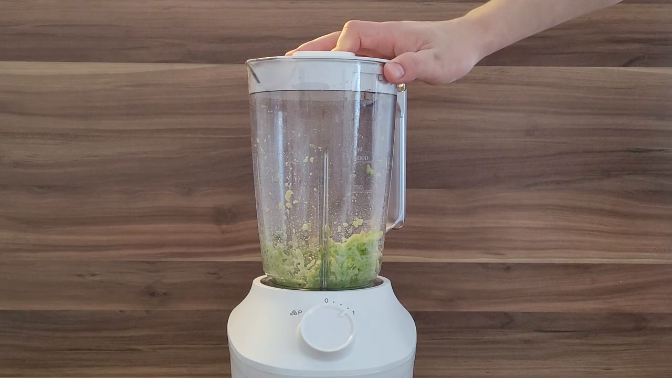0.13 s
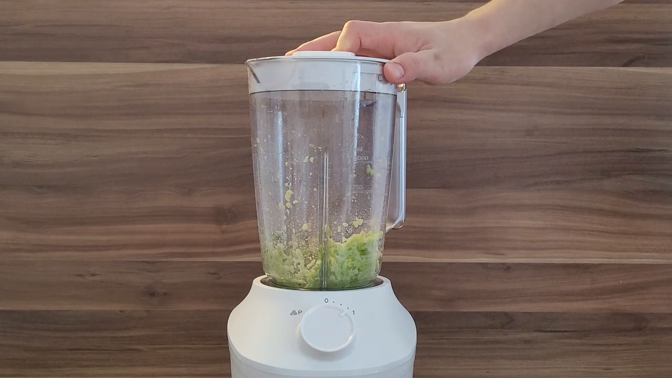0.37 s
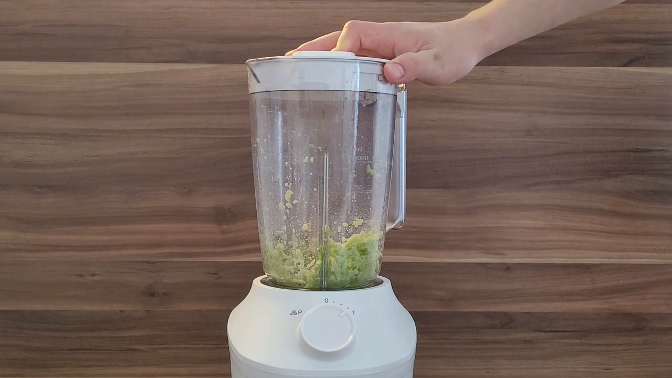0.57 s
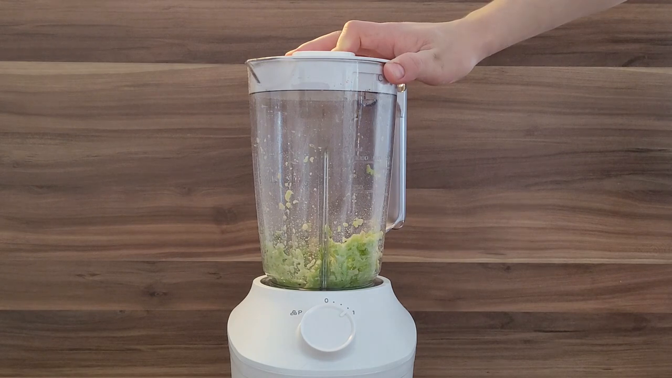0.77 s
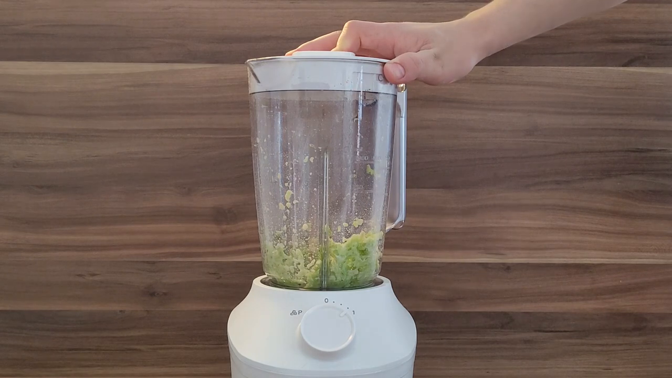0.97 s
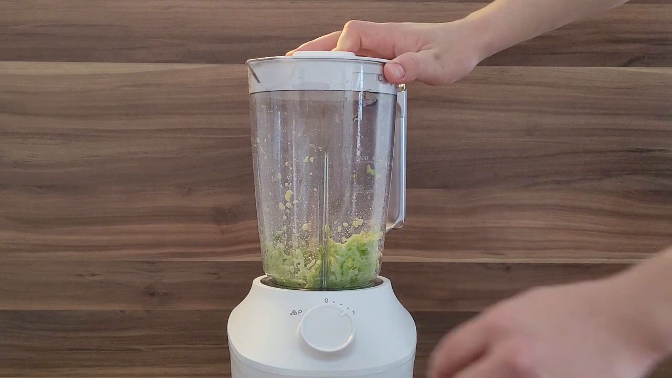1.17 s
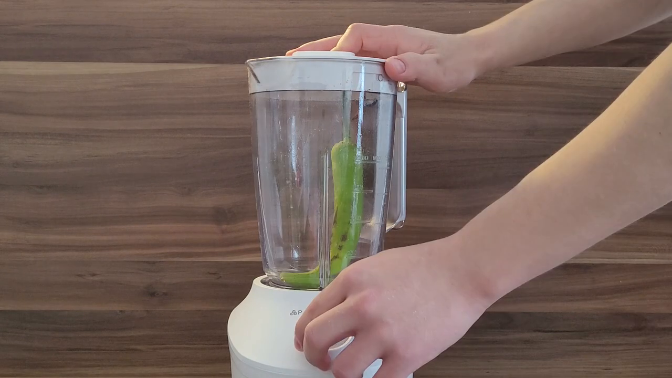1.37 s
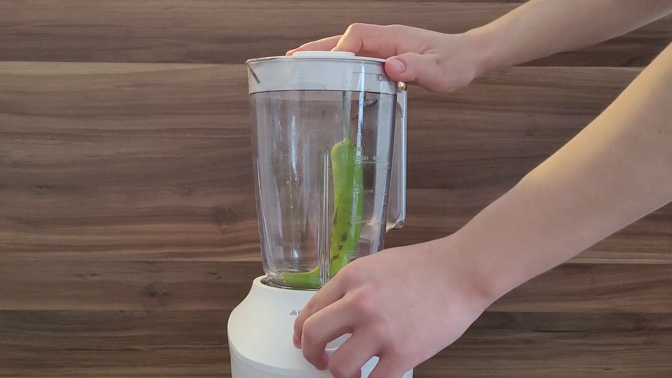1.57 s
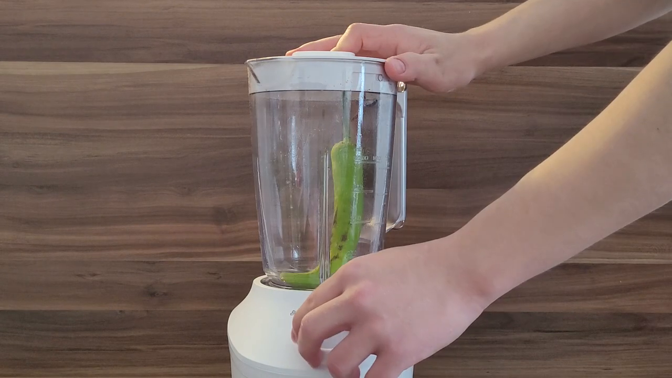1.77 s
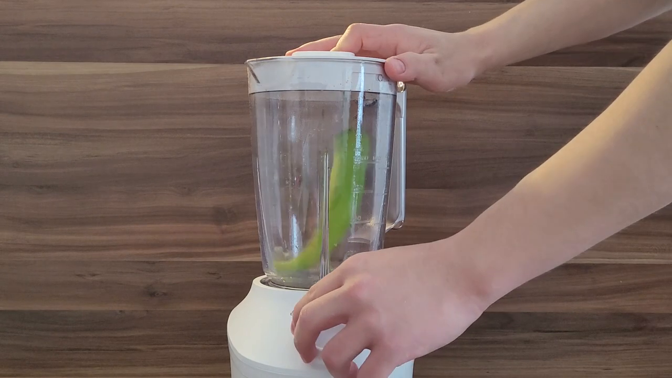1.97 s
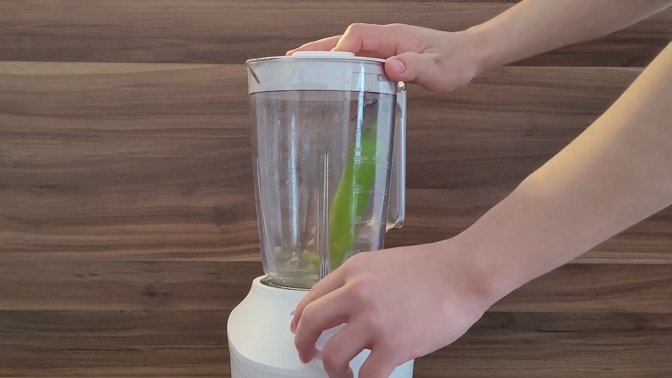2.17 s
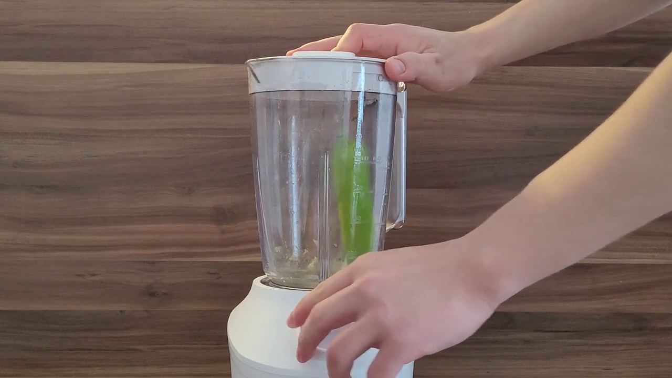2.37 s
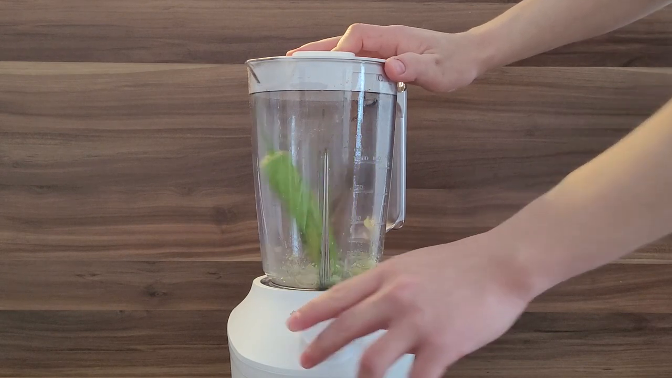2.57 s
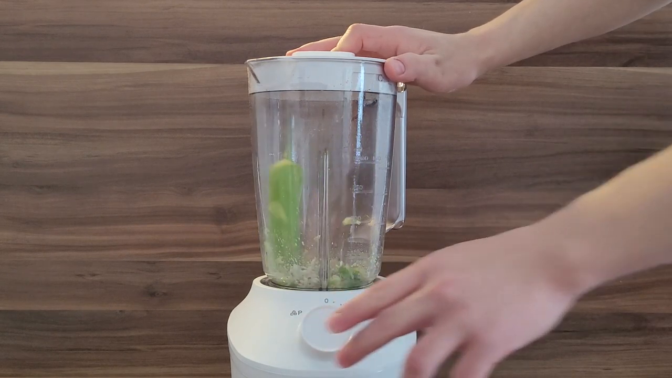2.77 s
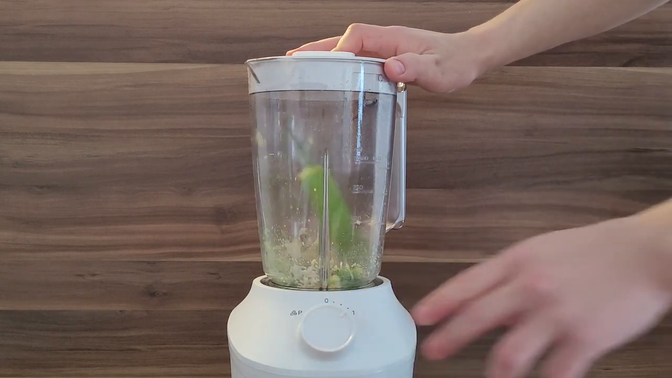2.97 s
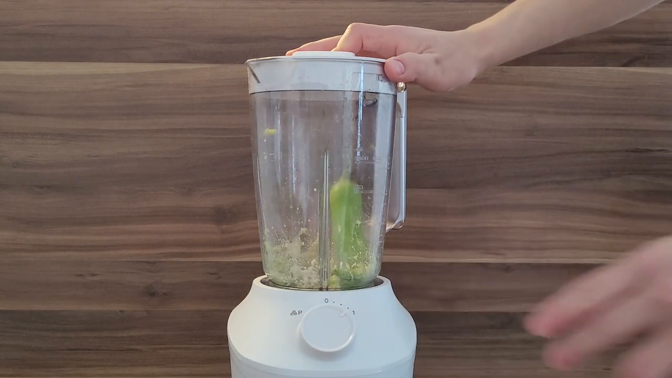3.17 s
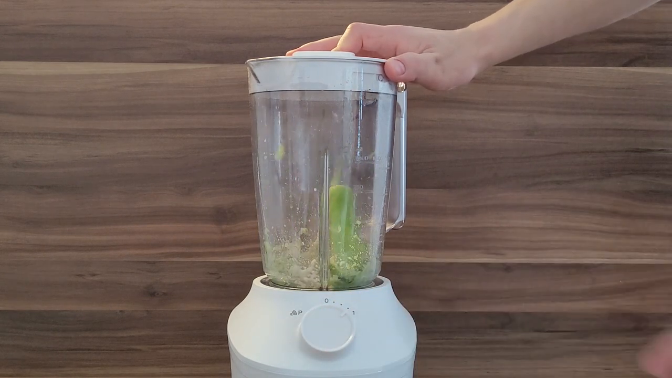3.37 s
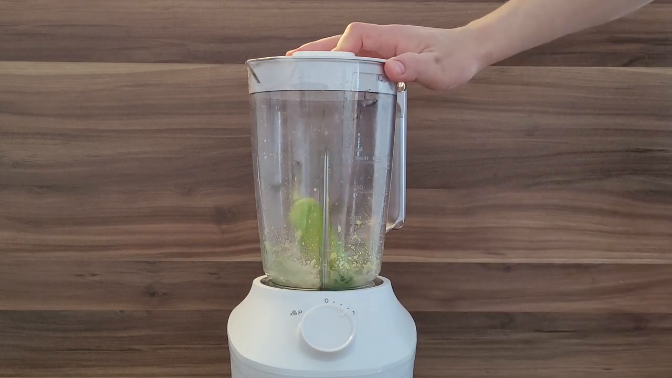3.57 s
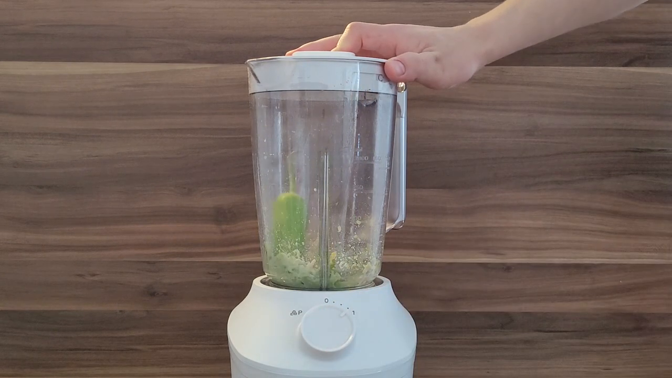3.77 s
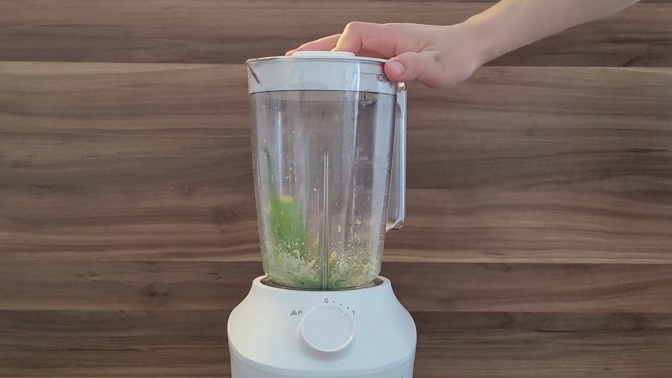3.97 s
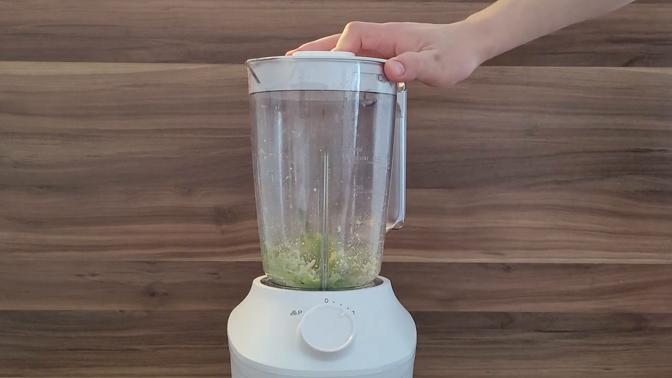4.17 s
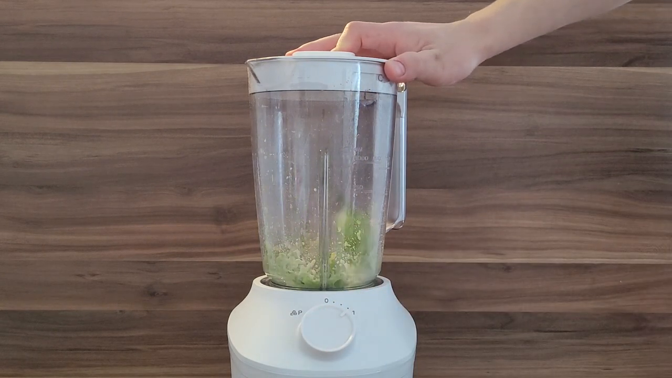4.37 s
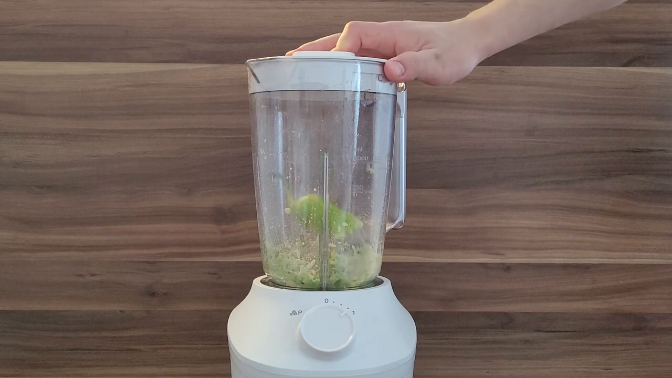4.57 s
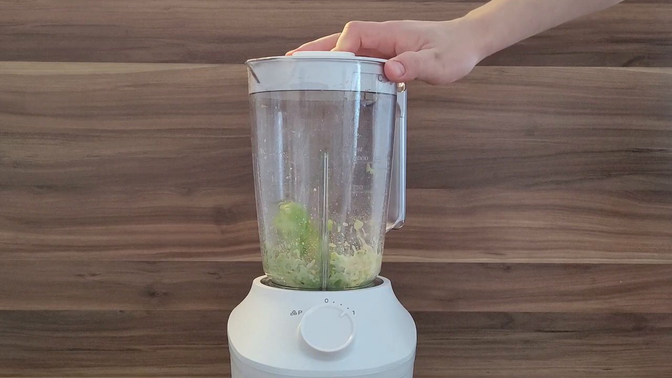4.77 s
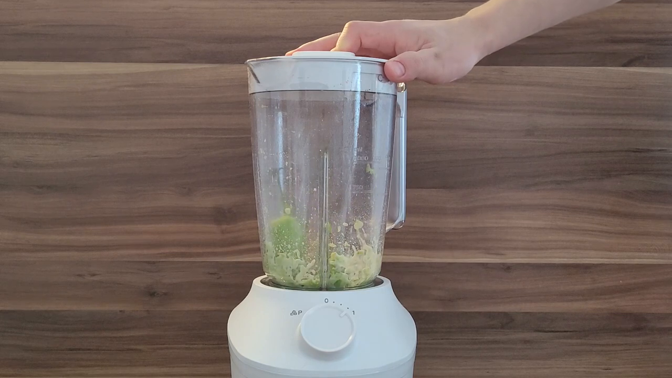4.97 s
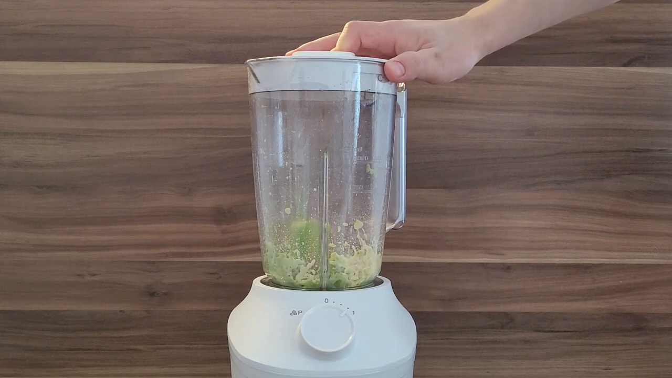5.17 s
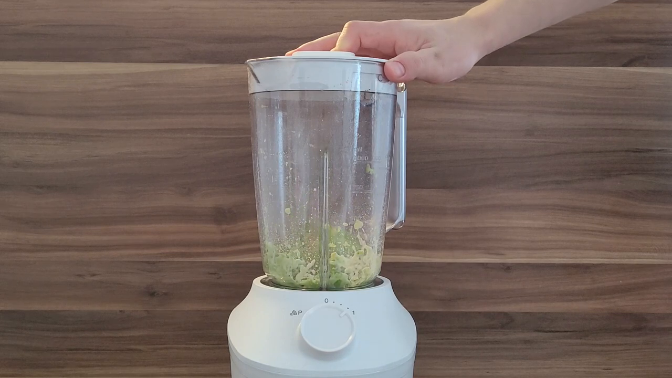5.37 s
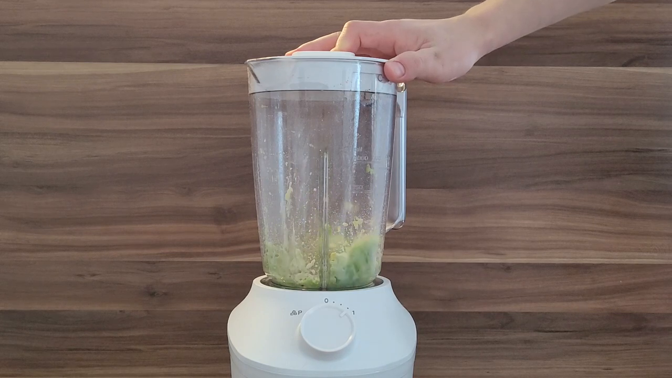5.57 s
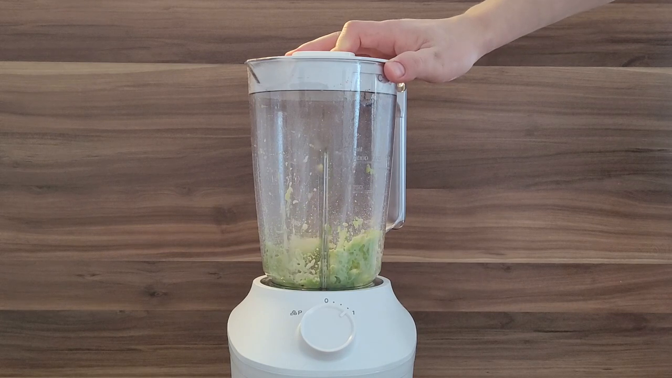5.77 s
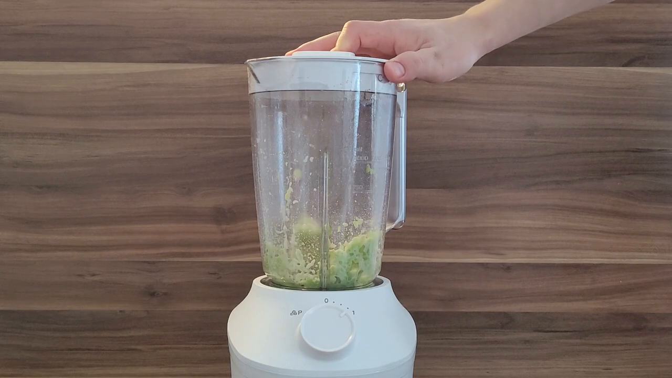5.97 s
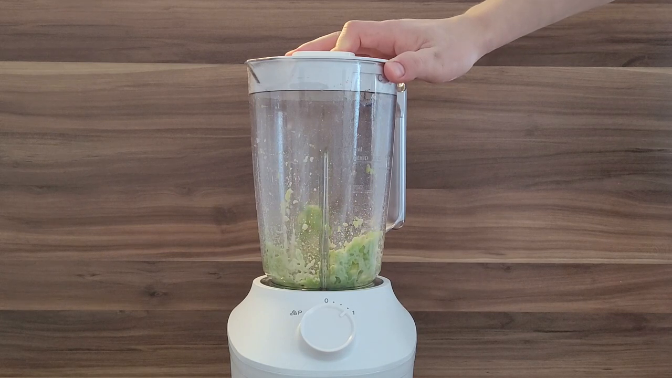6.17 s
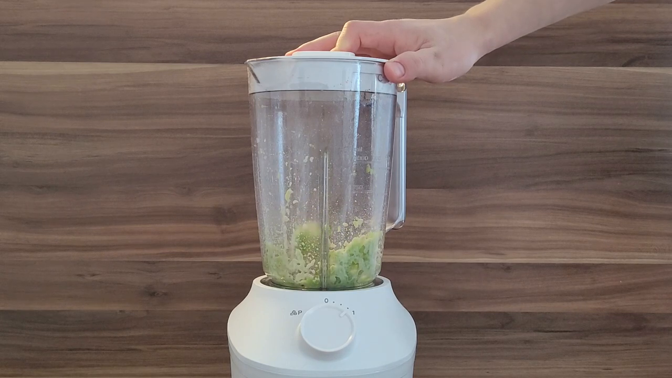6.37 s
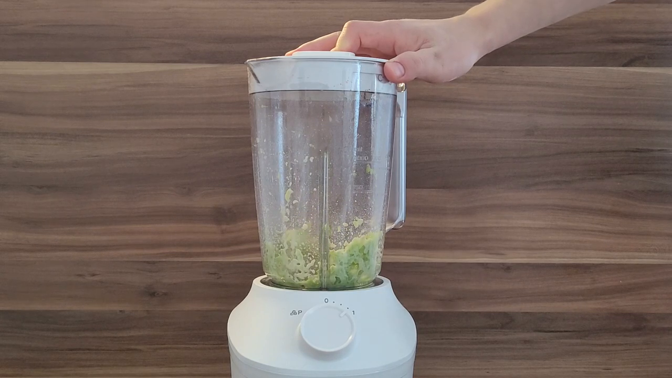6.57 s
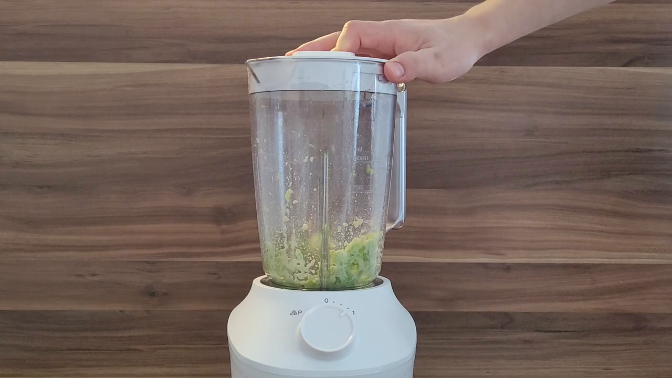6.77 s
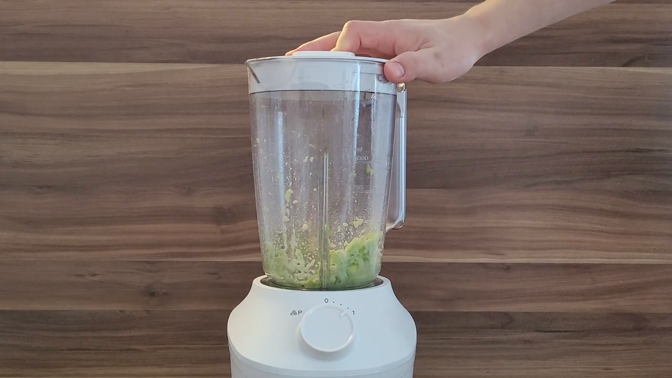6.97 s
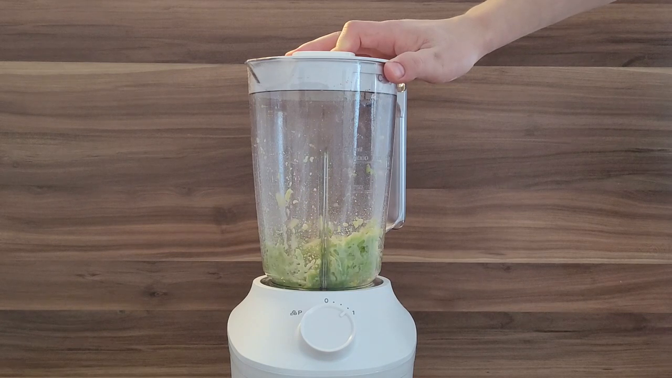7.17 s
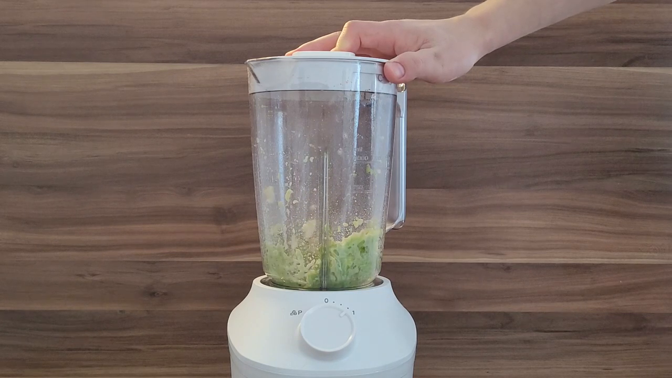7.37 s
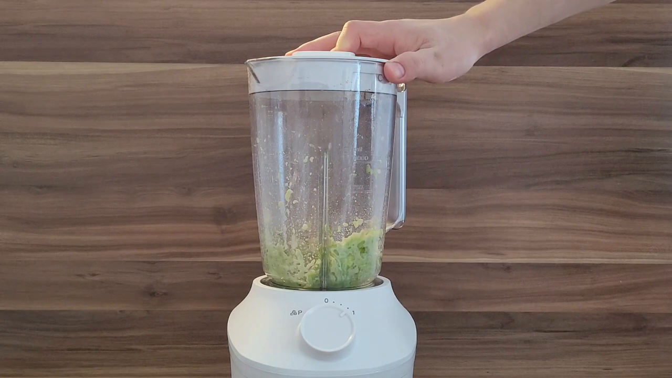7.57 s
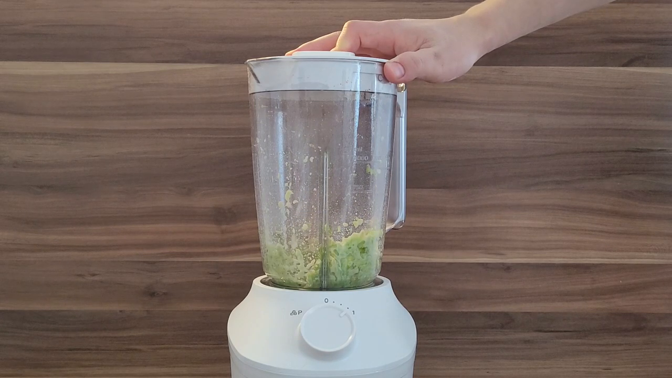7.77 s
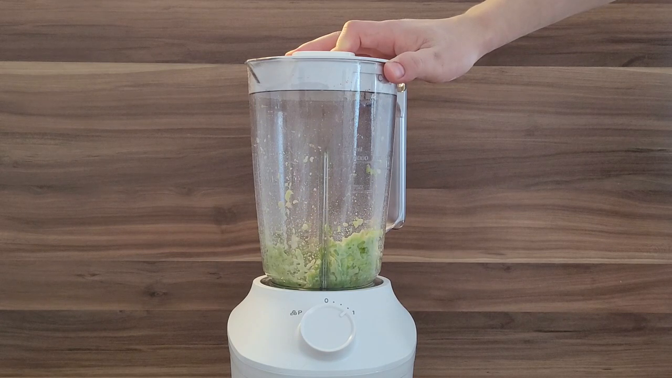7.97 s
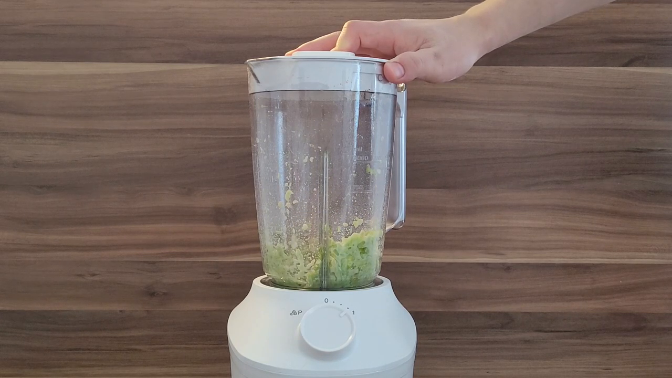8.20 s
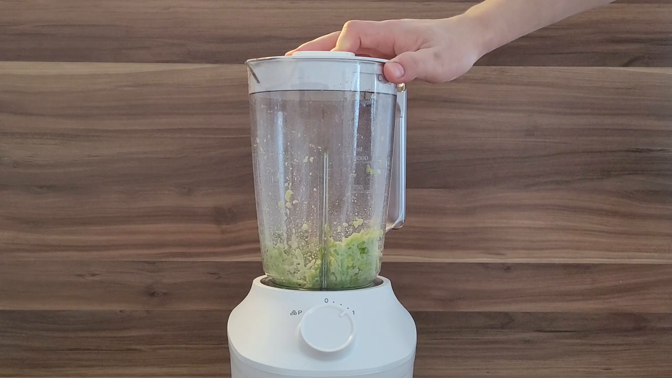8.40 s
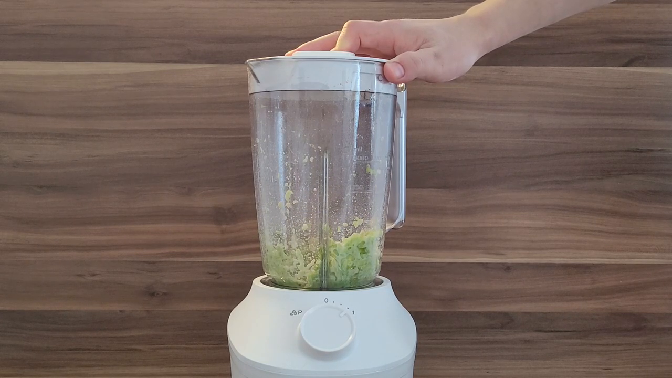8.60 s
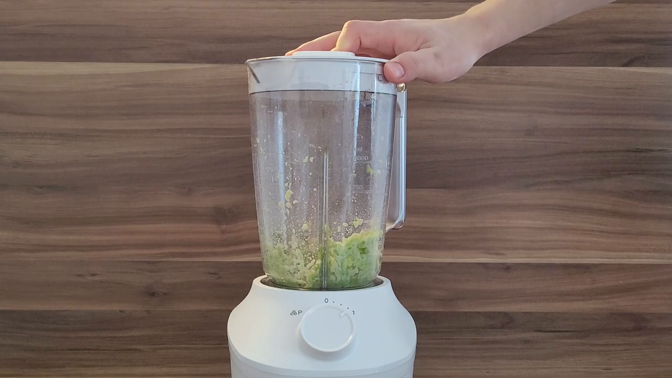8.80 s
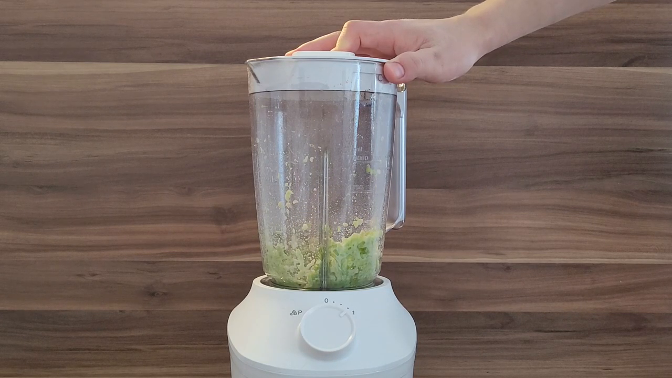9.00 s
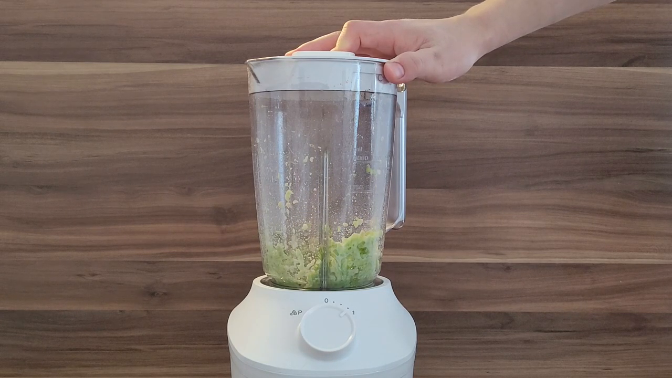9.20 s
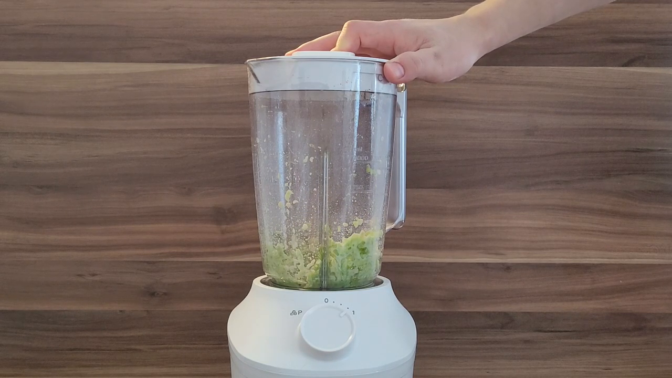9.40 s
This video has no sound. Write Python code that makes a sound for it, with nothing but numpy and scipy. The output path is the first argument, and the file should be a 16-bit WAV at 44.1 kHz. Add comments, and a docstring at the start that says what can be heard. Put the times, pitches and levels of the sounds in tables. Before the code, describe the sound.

Close stereo sound of a countertop blender in a quiet kitchen. From 0 to 1.2 seconds it spins freely at high speed: a steady bright whine with brush buzz, rushing air and a fine spray of clicking mince, cut off almost instantly. Faint room tone fills the gap until about 2.0, when the dial gives a quick double click and a low electrical buzz starts. From 2.1 the blades bite a whole pepper: dense, rough battering in surges, hard hollow knocks on the plastic jar, the motor sagging and recovering, all duller than before. Heavy bursts continue to about 4, with separate strong blows near 4.5, 5.2, 5.7, 6.7 and 7.1. Meanwhile the pitch creeps upward and the mince whirls. After 8 it is a fairly steady, dull humming churn; from 8.9 lower rocking tones join, still running at the end near 9.4.

```python
"""A countertop blender with a plastic jar in a kitchen, heard from close by with two microphones, left one nearer.
First it spins freely in minced pepper: motor tones, brush buzz, air noise and a spray of clicks, all breaking off.
After a pause of room tone the switch clicks, and the motor hums and buzzes up under a whole pepper.
Clustered clicks batter it in surges that brake the shaft, pieces knock on the jar, and mince whirls round it.
The shaft gathers speed as the pieces get smaller; near the end the rocking jar adds lower tones."""
import sys
import numpy as np
from scipy import signal
from scipy.fft import rfft, irfft, next_fast_len
from scipy.io import wavfile

SR = 44100
rng = np.random.default_rng(int(sys.argv[2]) if len(sys.argv) > 2 else 0)


def generate_wav(sig):
    """Save sig (samples, or channels by samples) to the path in sys.argv[1] as 16-bit PCM at SR."""
    pcm = np.round(np.clip(np.atleast_2d(sig).T, -1, 1) * 32767).astype(np.int16)
    wavfile.write(sys.argv[1], SR, pcm)


N = 416304
T = np.arange(N) / SR  # time [s]
SIZE = next_fast_len(N + SR // 2)  # transform length, with room for filter tails
HZ = np.maximum(np.arange(SIZE // 2 + 1) * SR / SIZE, 1)  # frequency of each transform bin

# Free run breaks off, switch is turned, blades begin to cut
BREAK_S, SWITCH_S, CUT_S = 1.237, 1.969, 2.066

# Shaft speed without drag, rising after the restart as the pieces shrink: (time [s], speed [turns/s])
UNLOADED_SPEED = [(0, 101.52), (1.22, 102.05), (1.97, 35), (2.15, 62.3), (2.35, 70.3), (2.7, 72.2),
                  (3.3, 81.85), (3.7, 83.6), (4.4, 84.7), (5, 86.05), (5.6, 85.9), (6.7, 88.1),
                  (7.8, 89.15), (8.7, 89.62), (9.44, 90.02)]
# Big pieces caught by the blades: (time [s], hold [s], level [dB], treble lift [dB])
BITES = [(2.10, .02, -24, 2.5), (2.24, .18, -20, 5), (2.559, .10, -20, 1.5), (2.83, .20, -18.5, 0.2),
         (3.342, .34, -23.5, -2), (3.81, .25, -21, -0.5), (4.321, 0.025, -30, 1), (4.508, .05, -17.5, 6),
         (5.071, .22, -24, 0), (5.672, .02, -15, 1.6), (5.829, .04, -26.5, -1.8), (6.11, 0.015, -24.5, -1),
         (6.381, .2, -32, -5), (6.732, .005, -18.5, -1.8), (7.151, .04, -13.5, 3.1),
         (7.78, .02, -27.5, -6.5), (7.91, 0.0044, -29.5, -5.5)]
# Chunks thrown against the jar: (time [s], strength [dB])
KNOCKS = [(2.066, 3), (2.102, 3.5), (2.139, 4), (2.223, 8), (2.272, 8), (2.303, 7.5), (2.44, 4),
          (2.911, 4.5), (3.423, 4), (3.554, -2), (3.676, 0), (3.842, 6), (3.891, 3), (3.963, 10.5),
          (4.043, 6.5), (4.507, 6.5), (5.133, 1), (5.238, 9.5), (5.279, 3.5), (5.641, 12.5), (5.823, 4.5),
          (5.938, 0.5), (6.124, 3), (6.721, 12.5), (6.943, 3.5), (7.107, 8.5), (7.144, 5.5), (7.178, 8),
          (7.769, -1), (7.906, -4.5), (8.472, -5)]
# Unbalanced shaft shaking the base, fitfully while the pepper is whole: (time [s], level [dB])
UNBALANCE = [(2.0, -38.5), (2.14, -32), (2.64, -36), (2.89, -24), (3.06, -33), (3.32, -24.5), (3.43, -36.5),
             (3.55, -30), (3.82, -45.5), (3.9, -28), (4.05, -25.5), (6.3, -25), (7.57, -30.5),
             (7.68, -26.5), (8.36, -25), (9.44, -26)]
# Detents passed by the dial: (time [s], strength [dB])
DETENTS = [(1.969, -7.5), (1.998, -13)]

# Tones of the free-running motor: (multiple of shaft speed [-], level [dB])
FREE_ORDERS = [(2, -40), (8 / 3, -34), (3, -28), (4, -43), (5, -48), (7, -42), (8, -49), (9, -33),
               (10, -49), (11, -40.5), (12, -49), (13, -44), (14, -48), (15, -36.5), (16, -44.5),
               (17, -43.5), (19, -45), (21, -45), (23, -44), (25, -46), (26, -47), (29, -47), (36, -47),
               (60, -49), (69, -56), (72, -46), (75, -52), (108, -55), (109, -55)]
# Tones of the loaded motor, 24 being the commutator: (multiple of shaft speed [-], level [dB])
LOADED_ORDERS = [(2, -48.5), (3, -46.5), (4, -43), (6, -49.5), (8, -44.5), (12, -43.5), (24, -46),
                 (25, -53), (36, -60.5), (48, -61.5), (60, -62.5), (72, -62.5)]
# Tones added by the rocking jar: (multiple of shaft speed [-], level [dB])
ROCKING_ORDERS = [(7 / 3, -33), (10 / 3, -37), (3, -39), (4.5, -44), (17 / 3, -40), (20 / 3, -43),
                  (26 / 3, -40.5)]

# Broad colour of each sound, scaled to unit power in use: (frequency [Hz], relative level [dB])
FREE_COLOUR = [(30, -42), (70, -31), (130, -8), (260, 1), (550, -16), (900, -5.5), (3400, -13),
               (4200, -15.5), (6000, -14.5), (6600, -20.5), (8000, -16), (8500, -26.5), (12000, -25.5),
               (15500, -29.5)]
CHOP_COLOUR = [(28, -14.5), (42, -6), (130, -9), (180, -17.5), (300, -6.5), (600, -2), (900, -4.5),
               (1200, -12.5), (1900, -16.5), (2600, -24), (3500, -24), (4500, -35), (6000, -27)]
CHURN_COLOUR = [(28, -14.5), (38, 0.5), (100, 1.5), (170, -25), (260, -14.5), (900, -8), (1200, -14.5),
                (2300, -20.5), (2700, -27.5), (4000, -27.5), (6000, -31)]
SWITCH_COLOUR = [(59, -48.5), (100, -27), (343, -4.5), (1690, -13), (1970, -12), (2680, -13), (3290, -17),
                 (3980, -11), (6000, -18), (7800, -40), (13200, -120)]
ROOM_COLOUR = [(18, -29), (30, 2), (93, -4.5), (135, -4), (231, -13.5), (1240, -25), (6000, -23.5),
               (7800, -43.5), (13200, -120)]

# Resonances of the machine running free: (frequency [Hz], width [Hz], lift [dB])
HOUSING = [(221, 8, 1), (303, 61, 4), (402, 51, 4), (495, 41, 5.5), (578, 24, 10), (698, 21, 14.5),
           (1299, 24, 6.5), (1906, 38, 9), (2584, 40, 10.5), (3220, 870, 5.5)]
# Resonances of the loaded jar: (frequency [Hz], width [Hz], lift [dB])
JAR = [(143.9, 34, 9.7), (190, 30, 6.4), (210.8, 30, 9.7), (243.2, 9.5, 10.8), (283.8, 27.8, 12.3),
       (335.3, 17, 5.7), (387, 16, 5.6), (452.5, 13, 8.5), (508, 46, 3.5), (601, 12, 8), (1254, 45, 2.6),
       (1460, 59, 5.7), (1769, 200, 5.6), (2397, 130, 5.1), (2910, 420, 1.3)]
# Jar wall ringing under the chopping: (frequency [Hz], width [Hz], lift [dB])
WALL = [(800, 40, 4), (854, 16, 8), (874, 22, 3.5), (1650, 20, 8)]
# Standing waves where a gliding motor tone swells or sinks: (frequency [Hz], width [Hz], lift [dB])
STANDING_WAVES = [(133, 16, 15), (224, 18, 11), (286, 18, 17), (485, 16, 11), (603, 20, 14), (644, 26, 15),
                  (982, 10, 7), (1805, 44, 12.5), (1885, 50, 3), (2070, 24, 2), (2093, 16, 8),
                  (2108, 8, -7), (2122, 20, 7), (2160, 24, -9), (3850, 350, 4), (5910, 130, 8)]

# Reflections against direct sound, free and loaded: (frequency [Hz], side over mid [dB])
FREE_SIDE = [(60, -15), (150, -15.5), (380, -11.5), (950, -6), (2380, -4), (5980, -3), (15000, -4)]
LOADED_SIDE = [(60, -18.5), (130, -8.5), (290, -5), (640, -3.5), (1410, -1.5), (3100, 0), (6820, 1.5),
               (15000, 0.5)]
# Lean to the left microphone, free and loaded: (frequency [Hz], left over right [dB])
FREE_LEAN = [(60, 2), (110, -0.5), (200, -1), (380, 0.5), (700, 0.5), (1290, -1), (2380, 4), (4400, 3.5),
             (8120, 1.5), (15000, 5.5)]
LOADED_LEAN = [(60, 0.5), (110, -4), (200, 1), (380, -1), (700, 4), (1290, 4), (2380, 1.5), (4400, 6.5),
               (8120, 2.5), (15000, 5)]

DRAG, RECOVERY_S = 353, .6  # turns/s lost per unit of sustained bite power; time constant of braking and recovery
GRAB_S, RELEASE_S = .06, .11  # amplitude time constants with which a bite builds up and lets go
CHOP_DB = -0.5  # gain on all the bites
SMALL_BITS_DB, SMALL_BITS_SWING_DB, SMALL_BITS_CRISP_DB = -30.5, 1.3, 0  # chopping between bites
UNBALANCE_SWING_DB = 1.0
ROCKING_S, ROCKING_RISE_S = 8.87, 0.11
LEFT_LEAD_S = 4e-5  # sound reaches the left microphone this much earlier
FREE_CUTOFF_HZ, LOADED_CUTOFF_HZ = 15750, 6050


def chopping(turns, bites):
    """The blades batter big pieces, which knock on the jar; crisper bites have more treble."""
    small_bits = from_db(SMALL_BITS_DB + SMALL_BITS_SWING_DB * drift(9)) ** 2
    power = bites.sum(axis=0) + small_bits
    bite_treble = from_db([row[-1] for row in BITES])
    # treble gain follows whichever bite is strongest at the time
    crisp = (bite_treble @ bites + from_db(SMALL_BITS_CRISP_DB) * small_bits) / power

    hits = blade_hits(turns, per_s=1200, spread_db=3.0, bunching=.9)
    hits = hits * from_db(CHOP_DB) * np.sqrt(power) * ramp(CUT_S, 0.04)
    knocks = impulses(KNOCKS)
    blows = scattered(hits, t60=0.057, wet_db=1.0) + scattered(knocks, t60=0.11, wet_db=16.0)
    treble = signal.sosfilt(signal.butter(1, 2200, "high", fs=SR, output="sos"), blows)
    return body(blows + (crisp - 1) * treble, CHOP_COLOUR, list(JAR) + list(WALL))


def bite_powers():
    """Power of each bite over time: it builds up, holds and lets go exponentially."""
    powers = []
    for s, held, db, _ in BITES:
        before = np.maximum(s - T, 0) / GRAB_S
        after = np.maximum(T - s - held, 0) / RELEASE_S
        powers.append(from_db(db) ** 2 * np.exp(-2 * np.minimum(before + after, 20)))
    return np.array(powers)


def blade_hits(turns, per_s, spread_db, bunching):
    """Bits of pepper meet the two blade pairs: uneven clicks bunched twice a turn, at unit power."""
    born = rng.random(N) < per_s * np.exp(bunching * np.cos(4 * np.pi * turns)) / SR
    sizes = from_db(spread_db * np.minimum(rng.exponential(1, N), 4))
    return rms_one(born * sizes * rng.choice([-1, 1], N))


def free_running(turns):
    """Fan air, brushes, a fine spray of mince and clear motor tones, all ending together."""
    air = rng.standard_normal((2, N))
    spray = scattered(blade_hits(turns, per_s=2500, spread_db=3.5, bunching=0.5), t60=0.061, wet_db=9.5)
    mix = from_db(-27.0) * air + from_db(-28) * spray + from_db(-33) * brush_scrape(turns)
    rush = body(mix, FREE_COLOUR, HOUSING)
    rumble = from_db(-58) * body(air, [(20, -17.5), (38, -4.0), (70, -3.5)])
    whine = sum(from_db(db) * tone(turns, order, waver=.17) for order, db in FREE_ORDERS)
    gate = np.interp(T, [BREAK_S - .001, BREAK_S, BREAK_S + .01, BREAK_S + .018], [1, .07, .05, 0])
    return to_microphones(rush + rumble + whine, FREE_SIDE, FREE_LEAN) * gate


def brush_scrape(turns, size=2048, count=150):
    """The commutator surface passes the brushes alike on every turn: a buzz of whole shaft orders."""
    surfaces = irfft(np.exp(2j * np.pi * rng.random((2, count))), size)
    places = turns % 1 * size
    return rms_one(np.array([np.interp(places, np.arange(size), s - s.mean()) for s in surfaces]))


def loaded_motor(turns, speed):
    """Shaft hum, commutator whine, the rocking jar, and the mains buzz of the starting current."""
    hum_db = in_time(UNBALANCE) + UNBALANCE_SWING_DB * drift(6.7)
    hum = from_db(hum_db) * tone(turns, 1, waver=0.064) * ramp(SWITCH_S, .04)

    lift_db = peaks(STANDING_WAVES)
    whine = sum(from_db(db + np.interp(order * speed, HZ, lift_db)) * tone(turns, order, waver=0.31)
                for order, db in LOADED_ORDERS) * ramp(CUT_S, 0.18)

    rocking = sum(from_db(db) * tone(turns, order, waver=0.14) for order, db in ROCKING_ORDERS)
    rocking = rocking * ramp(ROCKING_S, ROCKING_RISE_S)

    # at low speed the motor draws a heavy current, and its iron buzzes at 100 and 300 Hz
    inrush = ramp(1.992, 0.012) * (1 - ramp(2.08, 0.23))
    buzz = from_db(-32) * tone(100 * T, 3, waver=.8) + from_db(-33) * tone(100 * T, 1, waver=.8)
    return hum + whine + rocking + inrush * buzz


def shaft_speed(bites):
    """Turns per second: the motor sags under each bite and recovers slowly."""
    keep = np.exp(-1 / (RECOVERY_S * SR))
    sag = DRAG * signal.lfilter([1 - keep], [1, -keep], bites.sum(axis=0))
    return in_time(UNLOADED_SPEED) - sag


def tone(turns, order, waver):
    """One motor order as mid and side at unit power; the load makes its strength and phase flutter."""
    phase = 2 * np.pi * (order * turns + rng.random())
    along, across = 1 + waver * drift(30), waver * drift(30)
    cos, sin = np.cos(phase), np.sin(phase)
    return rms_one(np.array([along * cos + across * sin, along * sin - across * cos]))


def churning(turns):
    """Air noise and clicking mince whirl round the jar, fading in as cutting begins."""
    mince = scattered(blade_hits(turns, per_s=1200, spread_db=3.0, bunching=.6), t60=0.033, wet_db=-0.5)
    whirl = from_db(-29.5) * rng.standard_normal((2, N)) + from_db(-32.0) * mince
    return body(whirl * ramp(CUT_S, .3), CHURN_COLOUR, JAR)


def switch():
    """The dial snaps through its detents as impulses, and brush noise swells and dies away."""
    snap = scattered(impulses(DETENTS), t60=0.072, wet_db=17.5)
    brush_level = from_db(-42.5) * ramp(SWITCH_S, 0.035) * (1 - ramp(2.1, 0.17))
    return body(snap + brush_level * rng.standard_normal((2, N)), SWITCH_COLOUR)


def room_tone():
    """The quiet kitchen: faint steady noise with a broad colour."""
    return from_db(-83) * body(rng.standard_normal((2, N)), ROOM_COLOUR)


def scattered(clicks, t60, wet_db):
    """Clicks and their dense reflections in jar and kitchen: decaying noise, as mid and side."""
    tail = np.sqrt(fade(clicks ** 2, t60 / 2) * (1 - from_db(-120 / (t60 * SR))))
    wet = from_db(wet_db)
    mid, side = tail * rng.standard_normal((2, N))
    return np.array([(clicks + wet * mid) / np.sqrt(1 + wet ** 2), side])


def fade(x, t60):
    """Every impulse leaves an exponential tail, falling 60 dB in t60 seconds."""
    return signal.lfilter([1], [1, -from_db(-60 / (t60 * SR))], x + 1e-18)


def body(x, spectrum, resonances=()):
    """Causal (minimum-phase) filter of unit power gain: a broad colour with resonance peaks."""
    # above the last point the colour falls 60 dB per octave
    db = at_hz(spectrum, HZ) - 60 * np.maximum(np.log2(HZ / spectrum[-1][0]), 0)
    db = db + peaks(resonances)
    # folding the cepstrum onto positive time gives minimum phase
    cepstrum = irfft(np.log(rms_one(from_db(db))), SIZE)[:SIZE // 2]
    cepstrum[1:] *= 2
    return irfft(rfft(x, SIZE) * np.exp(rfft(cepstrum, SIZE)), SIZE)[..., :N]


def peaks(resonances):
    """Summed lift in dB of all resonances at each bin."""
    return sum(lift / (1 + (2 * (HZ - hz) / width) ** 2) for hz, width, lift in resonances)


def to_microphones(pair, side_db, lean_db, lead=0):
    """Direct sound is common to both microphones; reflections, lean and delay make them differ."""
    mid, side = rfft(pair, SIZE)
    side = side * from_db(at_hz(side_db, HZ))
    lean = from_db(at_hz(lean_db, HZ) / 2)
    late = np.exp(-2j * np.pi * HZ * lead)
    left, right = (mid + side) * lean, (mid - side) / lean * late
    return irfft(np.array([left, right]) * 2 / (lean + 1 / lean), SIZE)[:, :N]


def low_pass(x, hz):
    """A very steep top cut, 80 Hz from full to nothing."""
    return irfft(rfft(x, SIZE) * np.clip((hz - HZ) / 80 + .5, 0, 1), SIZE)[:, :N]


def impulses(rows):
    """One single-sample click for each (time [s], strength [dB])."""
    clicks = np.zeros(N)
    for s, db in rows:
        clicks[int(s * SR)] = from_db(db)
    return clicks


def in_time(rows):
    """A two-column table as a curve over time."""
    s, value = np.transpose(rows)
    return np.interp(T, s, value)


def at_hz(points, hz):
    """Read a spectrum on a log-frequency axis."""
    f, value = np.transpose(points)
    return np.interp(np.log(hz), np.log(f), value)


def ramp(start, length):
    """Rise from 0 to 1."""
    return np.clip((T - start) / length, 0, 1)


def drift(rate):
    """Smooth chance with spread 1, changing so many times a second."""
    knots = rng.standard_normal(4096)
    return np.interp(T * rate, np.arange(len(knots)), knots) * np.sqrt(3 / 2)


def from_db(db):
    """Decibels to gain."""
    return 10 ** (np.asarray(db) / 20)


def rms_one(x):
    """Scale each channel to unit power."""
    return x / np.sqrt(np.mean(x ** 2, axis=-1, keepdims=True) + 1e-20)


def scene():
    """One shaft drives everything; the second run is duller, with its hardest blows rounded off."""
    bites = bite_powers()
    speed = shaft_speed(bites)
    turns = np.cumsum(speed * (1 + .0005 * drift(14))) / SR
    loaded = chopping(turns, bites) + loaded_motor(turns, speed) + churning(turns) + switch() + room_tone()
    loaded = to_microphones(loaded, LOADED_SIDE, LOADED_LEAN, lead=LEFT_LEAD_S)
    loaded = loaded / (1 + (loaded / .85) ** 6) ** (1 / 6)  # peaks stay below .85
    return free_running(turns) + low_pass(loaded, LOADED_CUTOFF_HZ)


def record(dry):
    """The top of the whole sound is cut."""
    return low_pass(dry, FREE_CUTOFF_HZ)


dry = scene()
out = record(dry)
generate_wav(out)
```